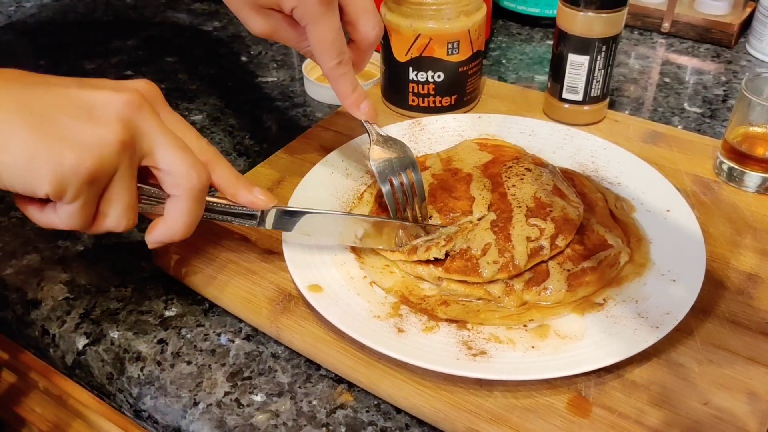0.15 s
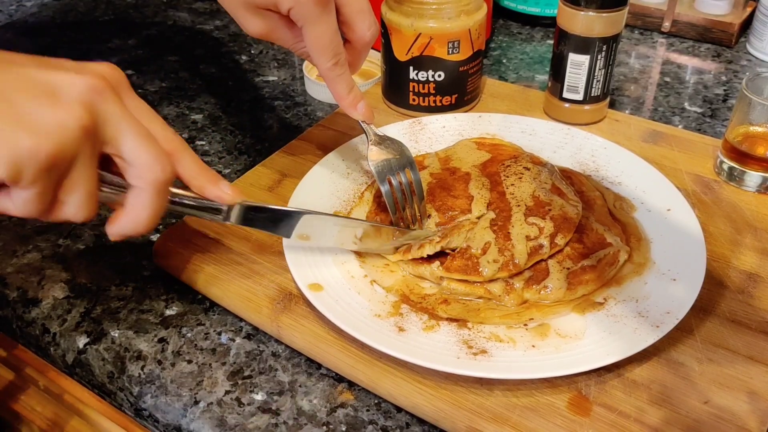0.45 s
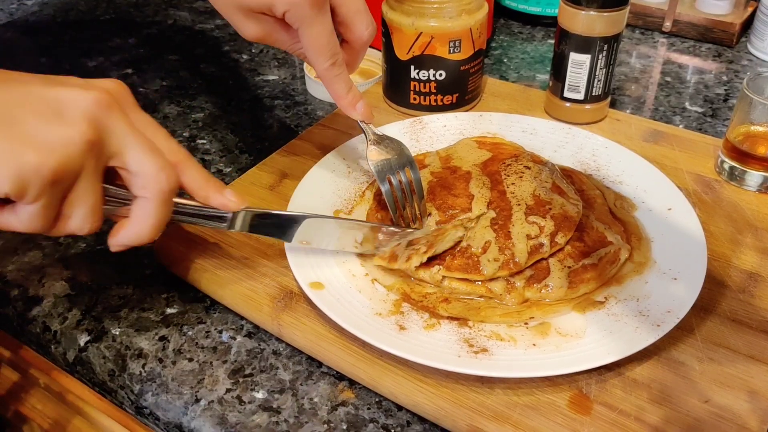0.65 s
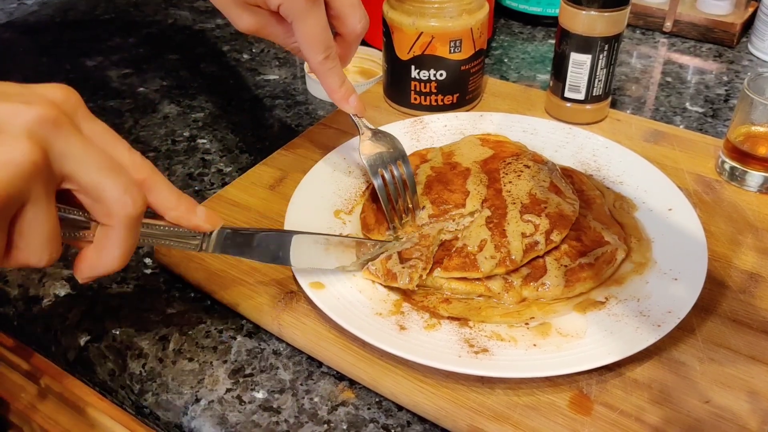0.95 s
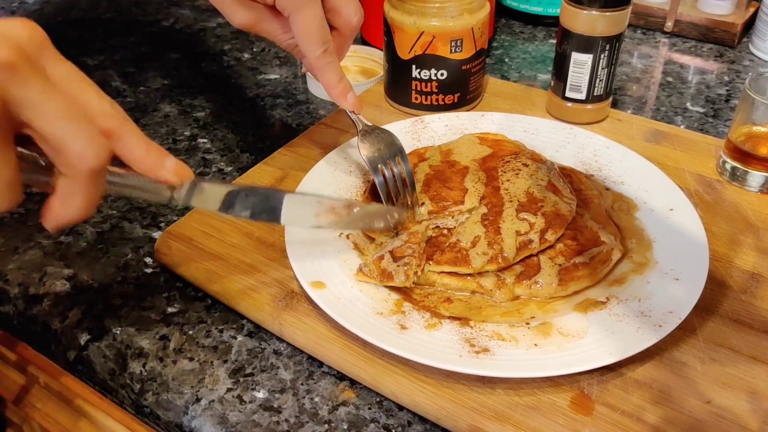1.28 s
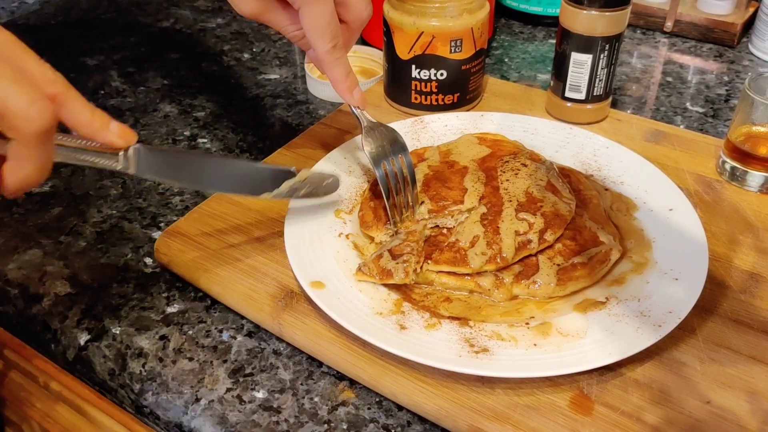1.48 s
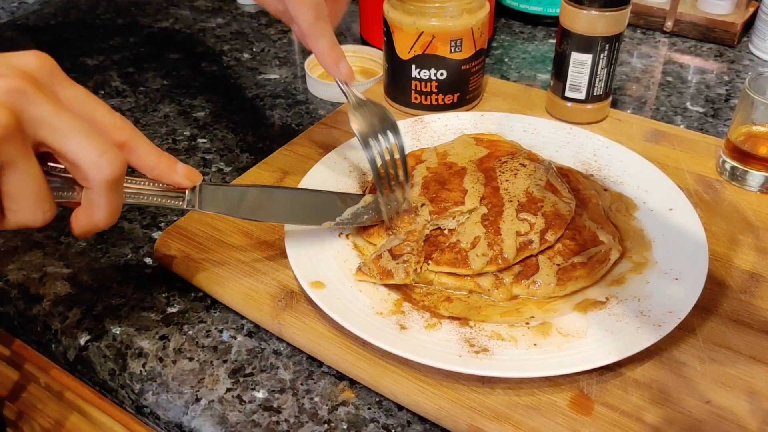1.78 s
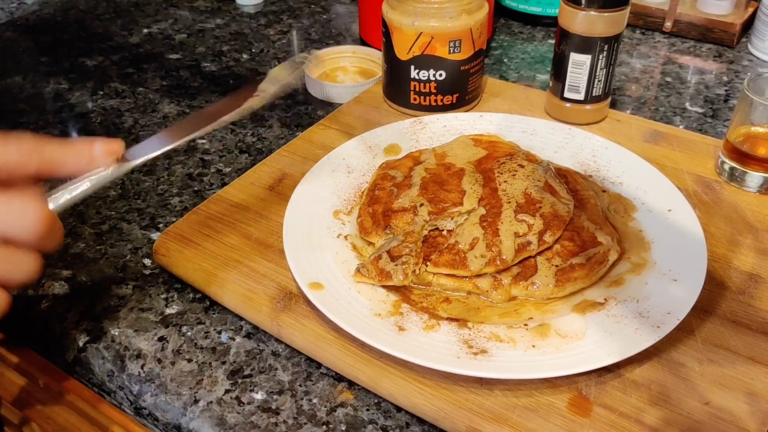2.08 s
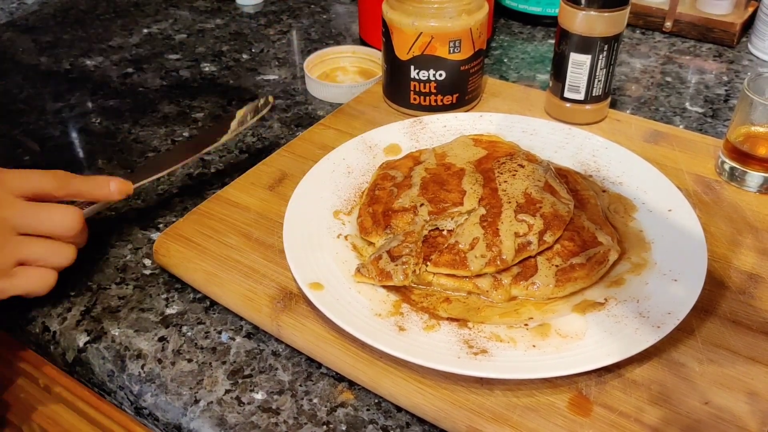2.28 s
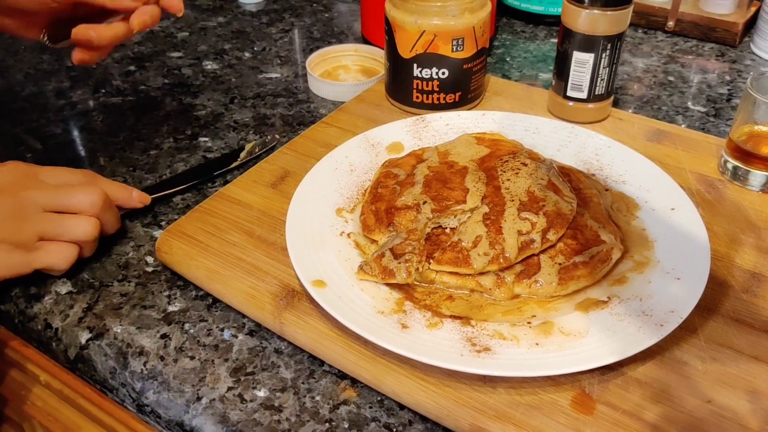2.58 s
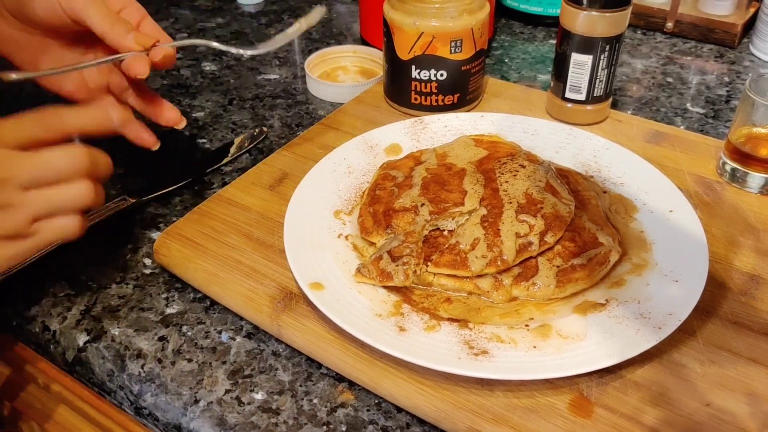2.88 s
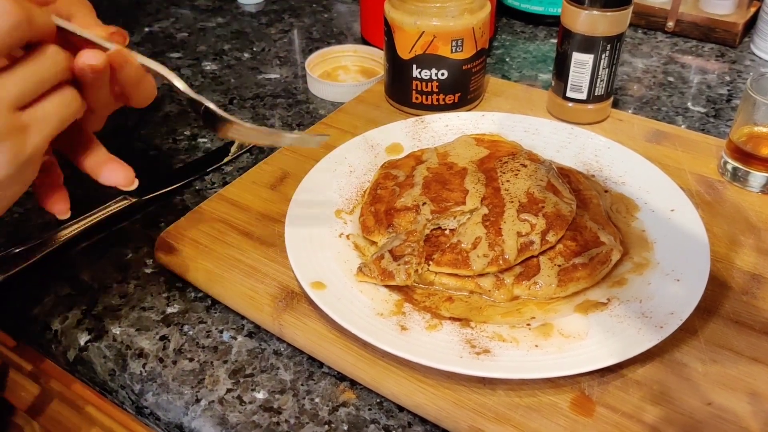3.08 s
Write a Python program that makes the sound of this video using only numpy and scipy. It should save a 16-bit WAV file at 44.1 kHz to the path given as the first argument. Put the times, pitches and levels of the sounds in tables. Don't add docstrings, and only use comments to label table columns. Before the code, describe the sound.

Metal knife on a plate, left of centre: soft scraping strokes, a bright ceramic knock, lighter taps and a faint fork ring, then a sharp tap and loud clattering drop on stone over low fridge rumble.

```python
import sys
import numpy as np
from scipy import signal
from scipy.fft import rfft, irfft
from scipy.io import wavfile
from scipy.ndimage import uniform_filter1d

SR = 44100
rng = np.random.default_rng(int(sys.argv[2]) if len(sys.argv) > 2 else 0)


def linear_from_db(decibels):
    return 10 ** (np.asarray(decibels, float) / 20)


def transcribe(signal):
    frames = np.atleast_2d(signal).T
    limited = np.clip(frames, -1, 1)
    pcm = np.round(limited * 32767).astype(np.int16)
    wavfile.write(sys.argv[1], SR, pcm)


N = 143325


def table(hz, rows):
    r = np.array(rows, float)
    return np.interp(np.log(np.maximum(hz, 1)), np.log(r[:, 0]), r[:, 1])


def unit(x):
    return x / np.sqrt(np.mean(x ** 2) + 1e-30)


def colour(x, rows, extra_db=0):
    hz = np.arange(x.shape[-1] // 2 + 1) * SR / x.shape[-1]
    return irfft(rfft(x) * linear_from_db(table(hz, rows) + extra_db), x.shape[-1])


def walk(n, rate):
    hold = max(int(SR / rate), 2)
    values = rng.standard_normal(n // 20 + 1)[:n // hold + 1]
    smooth = uniform_filter1d(np.repeat(values, hold), hold)
    return 1.6 * uniform_filter1d(smooth, hold)[:n]


def grit(n, rate, spread_db):
    chance, size, sign = rng.random(n), rng.exponential(size=n), rng.standard_normal(n)
    return (chance < rate / SR) * linear_from_db(spread_db * size) * np.sign(sign)


def sides(pan_db):
    return linear_from_db(np.array([[.5], [-.5]]) * pan_db)


def ring(push, modes, pan_db, tilt_db=0, scatter_db=0, wander_db=0, damp=1):
    swell_s = 0.00057
    soft = np.exp(-1 / (swell_s * SR))
    out = 0
    for hz, db, t60 in modes:
        luck, turn = rng.standard_normal(), np.pi / 2 + 0.47 * rng.standard_normal()
        pole = np.exp(2j * np.pi * hz / SR - np.log(1000) / (max(t60 * damp, .01) * SR))
        z = signal.lfilter([1], [1, -pole], push * linear_from_db(wander_db * walk(len(push), 32)))
        z = signal.lfilter([1 - soft], [1, -soft * pole / abs(pole)], z)
        gain = linear_from_db(db + scatter_db * luck + tilt_db * np.log2(hz / 3000))
        out = out + gain * sides(pan_db) * np.array([z.imag, (z * np.exp(1j * turn)).imag])
    return out


def clack(push, rows, t60, tilt_db=0):
    t = np.arange(len(push)) / SR
    hz = np.maximum(np.arange(len(t) // 2 + 1) * SR / len(t), 50)
    n = rng.standard_normal((3, len(t)))
    n = 0.38 * n[2] + n[:2]
    n = colour(n, rows, tilt_db * np.log2(hz / 3000)) * linear_from_db(-60 * t / max(t60, .01))
    return signal.fftconvolve(push[None], n, axes=1)[:, :len(t)]


def add(out, x, s):
    i = max(int(s * SR), 0)
    out[:, i:i + x.shape[1]] += x[:, :N - i]


def blows(hits, modes, rows, clack_db, clack_t60, scatter_db, chatter_s=.0005):
    out, t = np.zeros((2, N)), np.arange(SR // 3) / SR
    head = int(.015 * SR)
    for s, db, pan_db, damp, tilt_db in hits:
        push = grit(len(t), 2500, 1.77) * np.exp(-t / chatter_s)
        push[0] += 2.2
        tone = ring(push, modes, pan_db, tilt_db, scatter_db, damp=damp)
        noise = clack(push, rows, clack_t60 * damp, tilt_db)
        tone = tone / np.sqrt(np.mean(tone[0, :head] ** 2))
        noise = noise / np.sqrt(np.mean(noise[0, :head] ** 2))
        side = sides(pan_db)
        add(out, linear_from_db(db - 10) * (tone * side[0] + linear_from_db(clack_db) * noise * side), s - .0005)
    return out


# (frequency [Hz], density [dB per Hz])
FLOOR_SPECTRUM = [(15, 4), (40, 2.5), (90, -5.5), (250, -11.5), (600, -17.5), (1500, -27), (7500, -40),
                  (14000, -37.5)]
# (frequency [Hz], left-right difference [dB])
FLOOR_PAN = [(60, -6.5), (110, -9), (200, -0.5), (380, -1.5), (700, -0.5), (1290, -2), (2380, -4),
             (4400, -2), (8120, 3), (15000, 6)]


def floor():
    hz = np.arange(N // 2 + 1) * SR / N
    balance = np.array([[.5], [-.5]]) * table(hz, FLOOR_PAN)
    x = colour(rng.standard_normal((2, N)), FLOOR_SPECTRUM, balance)
    bump_s, bump_db, bump_hz, bump_len_s = 2.6, -37, 32, 0.032
    t = np.arange(N) / SR - bump_s
    bump = linear_from_db(bump_db) * np.exp(-(t / bump_len_s) ** 2) * np.cos(2 * np.pi * bump_hz * t)
    return unit(x) * linear_from_db(-49 + 0.39 * walk(N, 3)) + bump * np.array([[.4], [1.6]])


def room(x):
    level_db, pan_db, gap_s = -18.5, 11.5, 0.0042
    low_t60_s, high_t60_s = 0.28, 0.2
    t = np.arange(int(.6 * SR)) / SR
    n = rng.standard_normal((2, len(t)))
    low = signal.sosfilt(signal.butter(1, 3500, fs=SR, output="sos"), n)
    tail = low * linear_from_db(-60 * t / low_t60_s) + (n - low) * linear_from_db(-60 * t / high_t60_s)
    tail = tail * (t > gap_s)
    tail = tail / np.sqrt(np.sum(tail ** 2, axis=1, keepdims=True))
    return signal.fftconvolve(x[:1], tail, axes=1)[:, :N] * linear_from_db(level_db) * sides(pan_db)


# (time [s], peak level [dB], left-right difference [dB], centre frequency [Hz], width [octaves])
TICKS = [
    (.509, -52, 5, 8000, 1.5),
    (0.9202, -49, 11.5, 5040, 0.51),
    (0.9732, -41, 7.5, 2100, 0.26),
    (0.9742, -43.5, 8.5, 5540, 0.32),
    (1.7439, -47, 12, 2000, 0.67),
    (1.7444, -47, 7, 6000, 0.56),
    (2.2074, -48.5, 10, 5650, 0.74),
    (2.4414, -53.5, 9, 5000, 0.7),
]


def ticks():
    out, t = np.zeros((2, N)), np.arange(4096) / SR
    t60_s = 0.029
    for s, db, pan_db, hz, width in TICKS:
        bell = [(hz * 2 ** (k * width), -7 * k * k) for k in (-0.2, 1.1, -2.4, 0.29, 3.2)]
        x = colour(rng.standard_normal((2, len(t))), bell)
        add(out, unit(x) * linear_from_db(db - 8 - 60 * t / t60_s) * sides(pan_db), s - .0005)
    return out


# (time [s], peak level [dB], left-right difference [dB],
# ring length re free [0-1], brightness [dB per octave])
BOARD_HITS = [
    (1.2935, -34.5, 14.4, 0.81, -0.83),
]
# (frequency [Hz], level [dB], t60 [s])
BOARD_MODES = [(326, -3.5, 0.038), (632, 0.5, 0.078), (780, 1.5, 0.058), (1140, -8.5, 0.1)]
# (frequency [Hz], density [dB per Hz])
BOARD_CLACK = [(200, 0), (700, -1), (2500, -26), (9000, -49)]


def board_knock():
    return blows(BOARD_HITS, BOARD_MODES, BOARD_CLACK, clack_db=-10, clack_t60=.01, scatter_db=2.5)


RIM_HITS = [
    (1.1473, -33, 12, 0.61, 0.0013),
]
# (frequency [Hz], level [dB], t60 [s])
RIM_MODES = [(1150, 0, 0.11), (1766, -16, 0.54), (2100, 0.5, 0.048), (2610, -14, 0.27), (3060, -2.5, 0.065),
             (3640, -10, 0.098), (4323, -3, 0.17), (4670, -2.5, 0.16), (5152, -16, 0.12), (5830, 1, 0.091),
             (6460, -5, 0.12), (7000, -14, 0.22), (7960, -17, .14), (8400, -12, 0.097)]
# (frequency [Hz], density [dB per Hz])
RIM_CLACK = [(210, -41), (350, -11.5), (1140, -10), (3870, -12.5), (4470, -9.5), (14300, -50), (16500, -65)]


def rim_knock():
    return blows(RIM_HITS, RIM_MODES, RIM_CLACK, clack_db=-2.5, clack_t60=0.23, scatter_db=0.5)


FORK_HITS = [
    (1.2994, -43.5, 15, 0.93, 0),
]
# (frequency [Hz], level [dB], t60 [s])
FORK_MODES = [(1092, -10, .12), (1816, -14.5, 0.48), (2650, -10.5, 0.32), (3110, -6, 0.085),
              (3586, -16, 0.7), (4590, -2, 0.11), (5012, -8, .1), (5670, -3.5, .07)]


def fork_ring():
    return blows(FORK_HITS, FORK_MODES, RIM_CLACK, clack_db=-1.7, clack_t60=0.1, scatter_db=.4)


PLATE_HITS = [
    (.1486, -30.5, 14, 0.29, -3.5),
    (.5586, -15, 11, 0.66, -0.3),
]
# (frequency [Hz], level [dB], t60 [s])
PLATE_MODES = [(877, -4, .09), (520, -14, 0.08), (730, -9, 0.07), (1712, -11, 0.11), (2270, -1, 0.09),
               (2342, 4, 0.17), (2415, -3, 0.1), (3252, -8, 0.17), (3575, -16, 0.28), (5016, -4, 0.09),
               (5130, -8, 0.14), (5350, -8, .13), (5600, -10, 0.12), (6050, -13, 0.13)]
# (frequency [Hz], density [dB per Hz])
PLATE_CLACK = [(200, -30.5), (880, -6.5), (1300, -21.5), (2330, -6), (5200, -15), (7000, -21.5),
               (13700, -25.5), (16500, -38)]


def plate_knocks():
    return blows(PLATE_HITS, PLATE_MODES, PLATE_CLACK, clack_db=-2.8, clack_t60=0.148, scatter_db=1.7,
                 chatter_s=.004)


# (start [s], length [s], level [dB], brightness [dB per octave])
SAWS = [
    (.01, 0.26, -67, 11.5),
    (0.281, 0.058, -66, 0),
    (0.346, 0.12, -71, 10.5),
    (0.483, 0.091, -63, 6),
    (0.697, .12, -60.5, 8),
    (0.976, 0.12, -63, -10),
    (1.246, 0.089, -63.5, 7),
    (1.526, 0.051, -81, -9),
]


def sawing():
    out, t = np.zeros((2, N)), np.arange(SR // 4) / SR
    grains_per_s, pan_db, hiss_db = 1900, 8.5, -8
    for s, length, db, tilt_db in SAWS:
        press = np.sin(np.pi * np.clip(t / length, 0, 1))
        push = grit(len(t), grains_per_s, 2.8) * press
        tone = ring(push, PLATE_MODES[3:], pan_db, tilt_db, scatter_db=2.4, damp=0.26)
        hiss = colour(rng.standard_normal((2, len(t))), [(800, -1.0), (3000, 0.5), (12000, -15)])
        hiss = unit(hiss) * press * sides(pan_db)
        tone = unit(tone) * np.sqrt(np.mean(press ** 2))
        add(out, linear_from_db(db) * (tone + linear_from_db(hiss_db + tilt_db) * hiss), s)
    return out


TIP_HITS = [
    (2.5865, -23.5, -0.12, 0.48, 2),
]
# (frequency [Hz], level [dB], t60 [s])
KNIFE_MODES = [(2110, -18, .15), (3600, -9, .09), (4130, -15, .08), (4344, -21, .12), (5350, -10, .15),
               (6660, -10, .09), (6970, -16, .1), (8622, 2, .09), (8965, -14, .12), (10575, -5, .085),
               (11030, -11, .11), (12805, -9, .085), (13550, -12, .11), (15342, -9, .065)]
# (frequency [Hz], density [dB per Hz])
TIP_CLACK = [(120, -40), (350, -10), (2100, -19.5), (3400, -8.5), (4500, -18), (5200, -7.5), (9000, -9),
             (15000, -6)]


def tip_tap():
    return blows(TIP_HITS, KNIFE_MODES, TIP_CLACK, clack_db=8.46, clack_t60=0.42, scatter_db=0.83,
                 chatter_s=0.0062)


REST_HITS = [
    (3.026, -32, 12.3, 1, 0),
]
# (frequency [Hz], level [dB], t60 [s])
REST_MODES = [(1072, 0, 0.074), (1550, 2, .08), (2110, -6, 0.16), (2750, -3, .12), (4344, -8, .3),
              (5362, -9, 0.35), (11060, -16, .18), (13560, -17, .14)]
# (frequency [Hz], density [dB per Hz])
STONE_CLACK = [(100, -14.5), (300, -3.5), (1080, -3), (1550, -5.5), (3500, -5.5), (7000, -11.5),
               (9500, -35.5), (16000, -39.5)]


def rest_ring():
    return blows(REST_HITS, REST_MODES, STONE_CLACK, clack_db=-1.7, clack_t60=0.1, scatter_db=.4)


# (time [s], contact pressure [dB], left-right difference [dB])
SLIDE = [
    (2.85, -29, 15),
    (2.868, -33, 6),
    (2.889, -25, -2),
    (2.911, -31.5, -1),
    (2.936, -31.5, 0.5),
    (2.977, -29, 5),
    (3.026, -39, 12.5),
    (3.049, -72, 5),
]


def slide():
    c = np.array(SLIDE, float)
    t = c[0, 0] + np.arange(SR // 2) / SR
    press = linear_from_db(np.interp(t, c[:, 0], c[:, 1], right=-120))
    push = grit(len(t), 1300, 3.17) * press
    tone = ring(push, KNIFE_MODES + COUNTER_MODES, 0, wander_db=3, damp=0.8)
    noise = clack(push, STONE_CLACK, 0.094)
    mix = unit(tone) + linear_from_db(-4.5) * unit(noise)
    out = np.zeros((2, N))
    pan_db = np.interp(t, c[:, 0], c[:, 2])
    add(out, mix * np.sqrt(np.mean(press ** 2)) * sides(pan_db), c[0, 0])
    return out


KNIFE_HITS = [(2.8455, -16, 7.1, 0.25, 2), (2.856, -19.5, 4.7, 0.25, -1), (2.869, -23.5, 3, 0.56, 9),
              (2.8823, -14.5, 1, 0.63, 0.5), (2.896, -21, 2.5, 0.69, 2), (2.909, -24, 3, 0.32, -3),
              (2.919, -15, 4, 0.88, 1.5), (2.934, -20.5, 4, .5, 5), (2.945, -20, 6, 0.6, 6.5),
              (2.966, -19.5, 12, 0.76, 4.5), (2.99, -26, 9, 0.25, -0.5), (3.012, -30, 13.8, 0.58, -3.5)]


def knife_chatter():
    return blows(KNIFE_HITS, KNIFE_MODES + COUNTER_MODES, STONE_CLACK, clack_db=-9.5, clack_t60=0.24,
                 scatter_db=1.5, chatter_s=0.0218)


DROP_HITS = [
    (2.7488, -16, 19.7, 0.76, 1),
    (2.7525, -12.5, 9.5, 0.51, 0.18),
    (2.7615, -14, 10, 0.53, 1),
    (2.775, -21, 7.3, 1, 0.21),
]
# (frequency [Hz], level [dB], t60 [s])
FLAT_MODES = [(2110, -14, .2), (3601, 0, .09), (4177, -6, .15), (5340, -2, .09), (5852, -16, .2),
              (6621, -3, .11), (6975, -2, .11), (8640, -5, .06), (8975, -1, .12), (10580, -14, .15),
              (11022, -6, .14), (12815, -8, .13), (13550, -9, .12), (15342, -6, .14)]
# (frequency [Hz], level [dB], t60 [s])
HANDLE_MODES = [(2660, -14, 0.084), (4910, -14, 0.13), (6050, -21, .1), (7600, -23.5, .1), (8090, -17, .12)]
# (frequency [Hz], level [dB], t60 [s])
STONE_MODES = [(724.8, -11, 0.1), (1065, -2, 0.11), (1519, -1, 0.1)]
COUNTER_MODES = HANDLE_MODES + [(hz, db - 4.5, t60) for hz, db, t60 in STONE_MODES]


def knife_drop():
    return blows(DROP_HITS, FLAT_MODES + COUNTER_MODES, STONE_CLACK, clack_db=-5.5, clack_t60=0.16,
                 scatter_db=0, chatter_s=.004)


def scene():
    table_sounds = ticks() + board_knock() + rim_knock() + fork_ring() + plate_knocks() + sawing()
    knife_sounds = tip_tap() + rest_ring() + slide() + knife_chatter() + knife_drop()
    near = table_sounds + knife_sounds
    return near + room(near) + floor()


def band_limit(x):
    return signal.sosfilt(signal.butter(12, 16870, fs=SR, output="sos"), x)


def record(dry):
    top_hz, slope_hz, leak_db = 15560, 150, 26
    hz = np.arange(N // 2 + 1) * SR / N
    loss_db = leak_db * np.clip((hz - top_hz) / slope_hz, 0, 1)
    finished = irfft(rfft(dry) * linear_from_db(-loss_db), N)
    return band_limit(finished)


dry = scene()
out = record(dry)
transcribe(out)
```